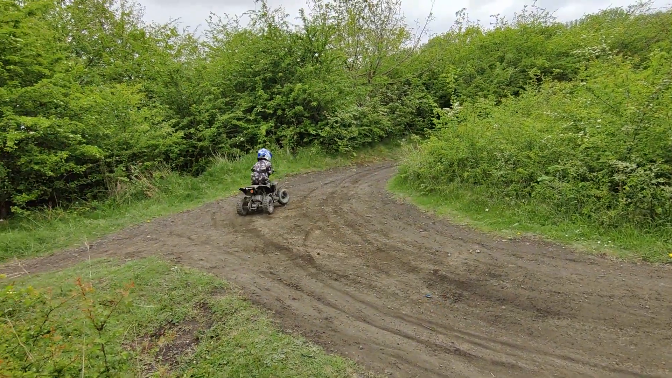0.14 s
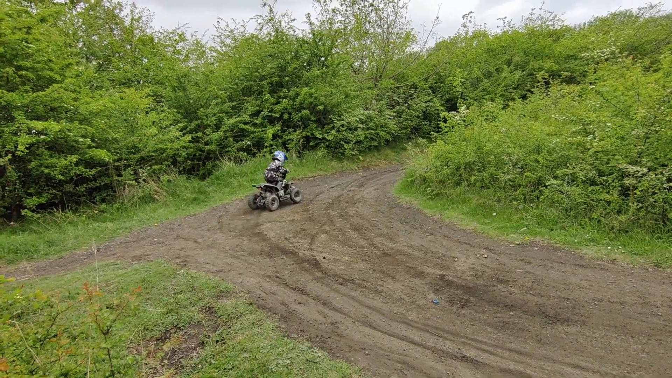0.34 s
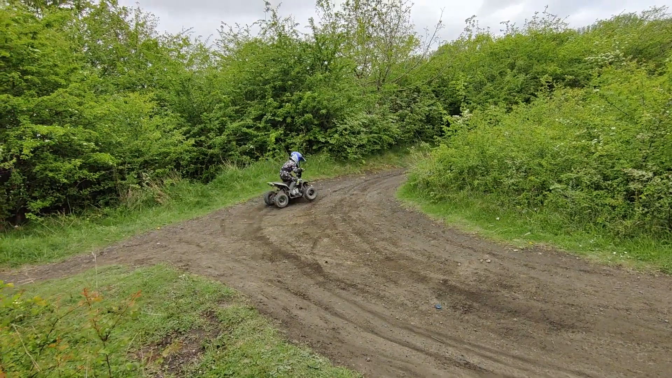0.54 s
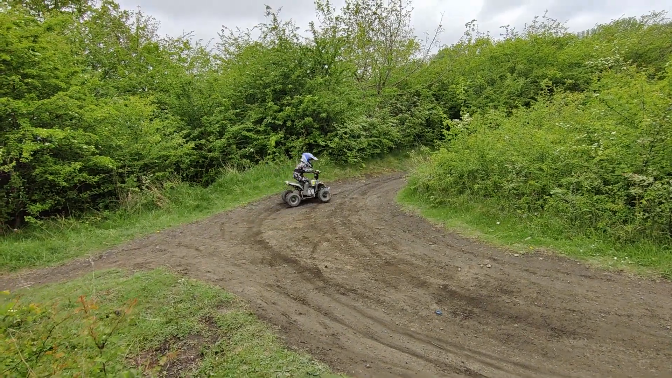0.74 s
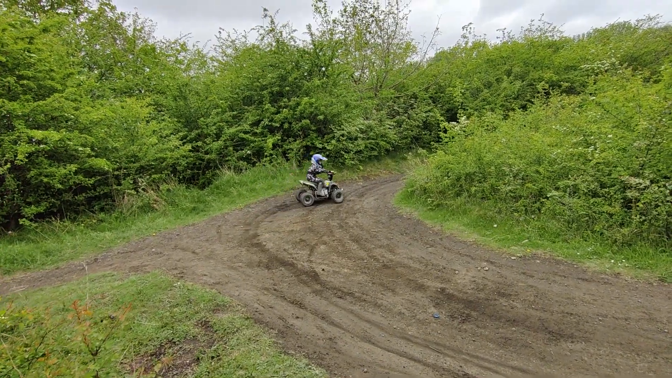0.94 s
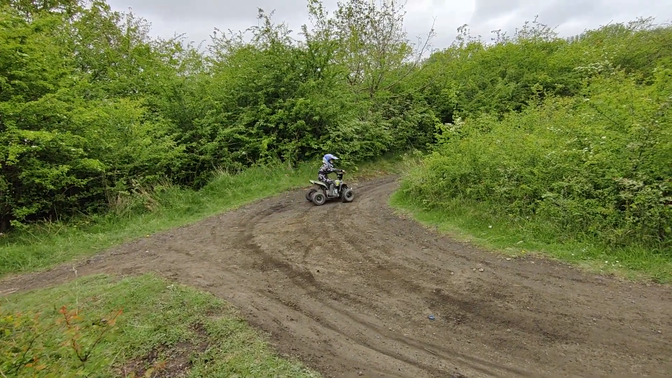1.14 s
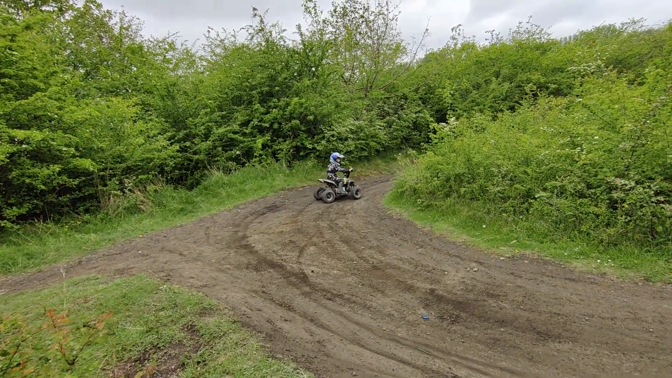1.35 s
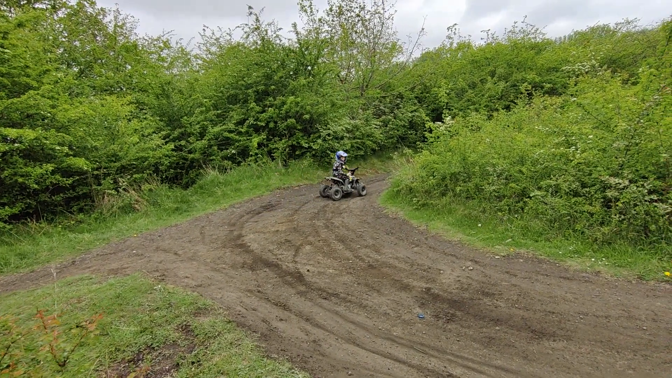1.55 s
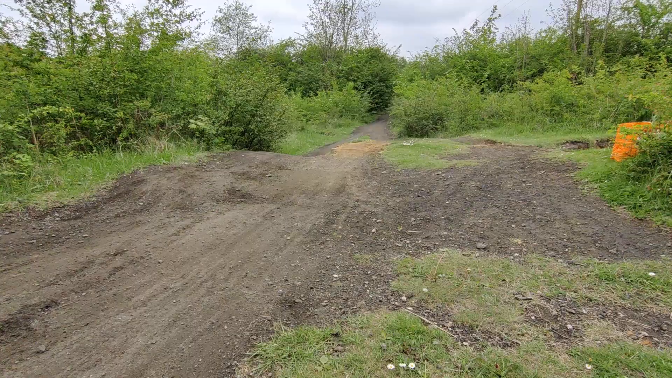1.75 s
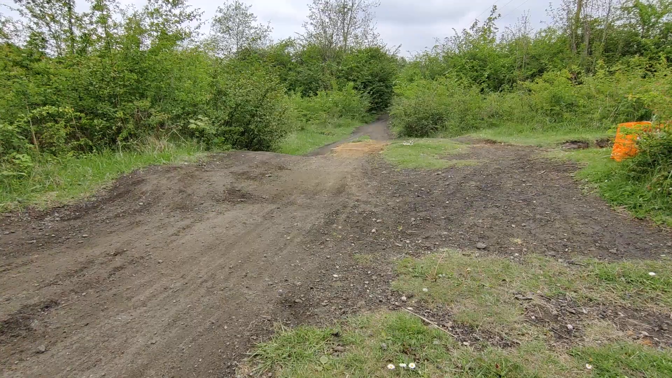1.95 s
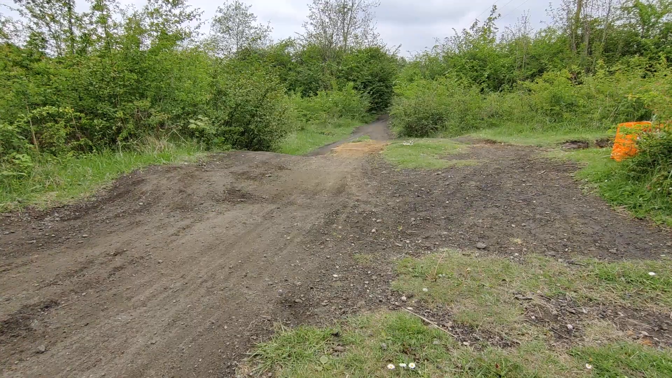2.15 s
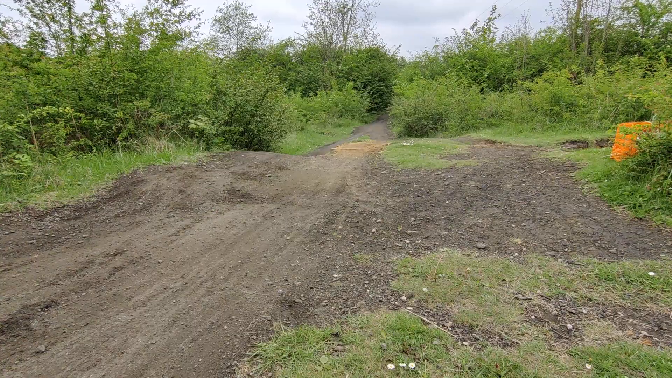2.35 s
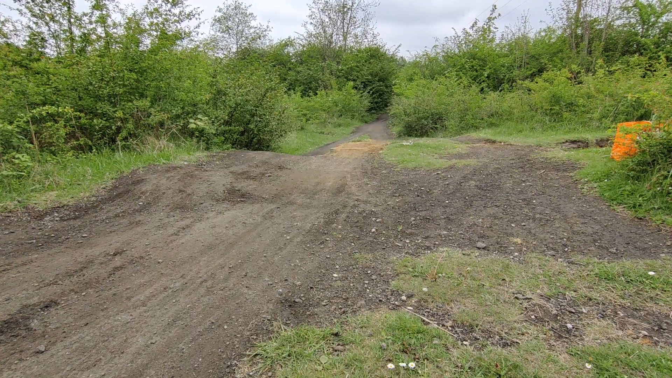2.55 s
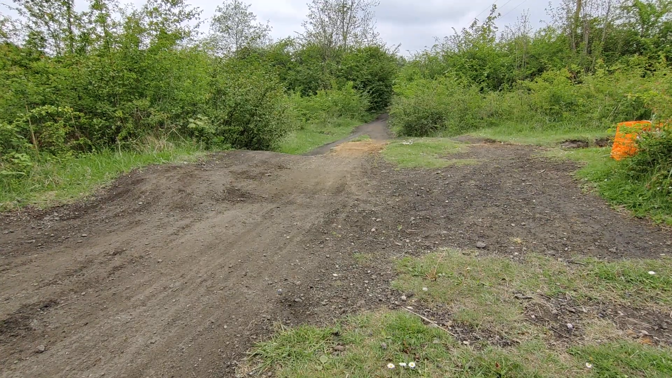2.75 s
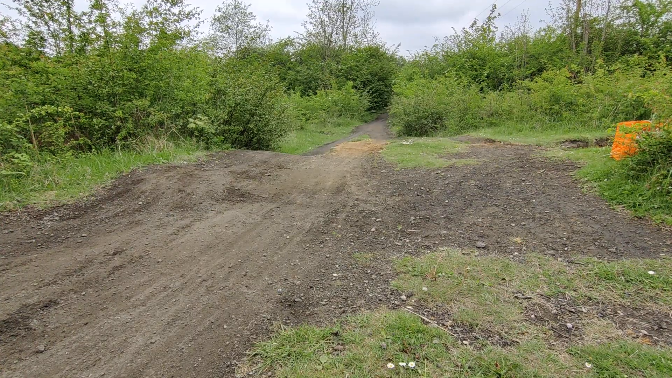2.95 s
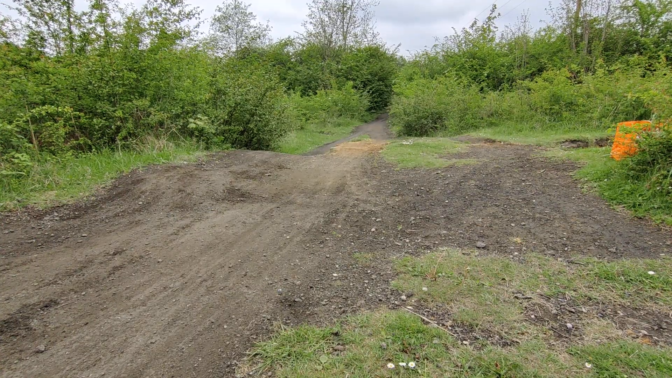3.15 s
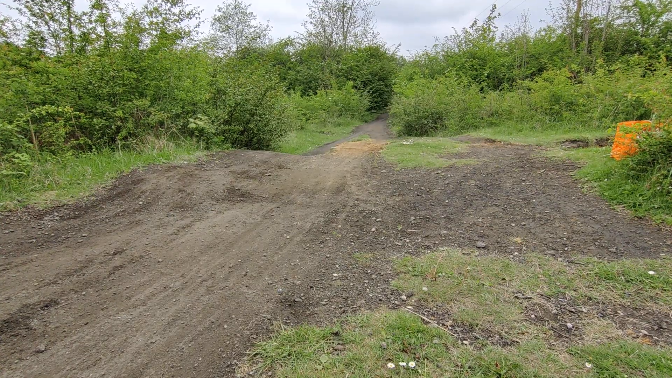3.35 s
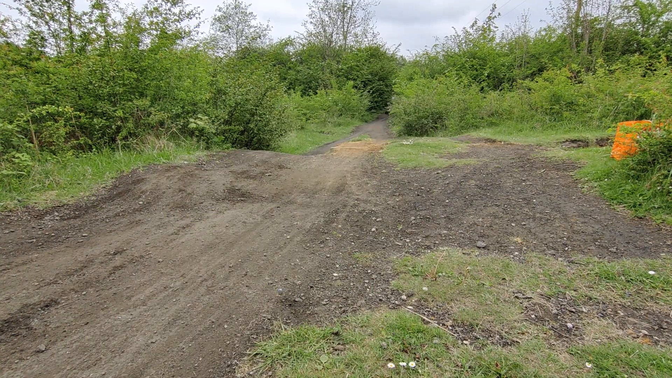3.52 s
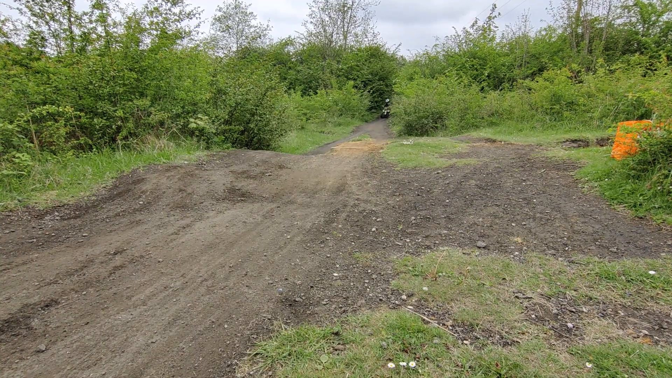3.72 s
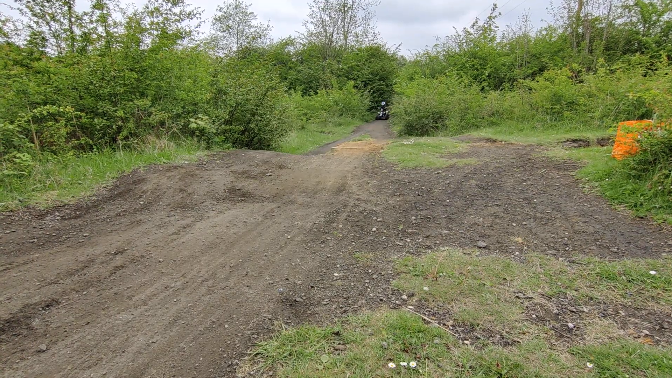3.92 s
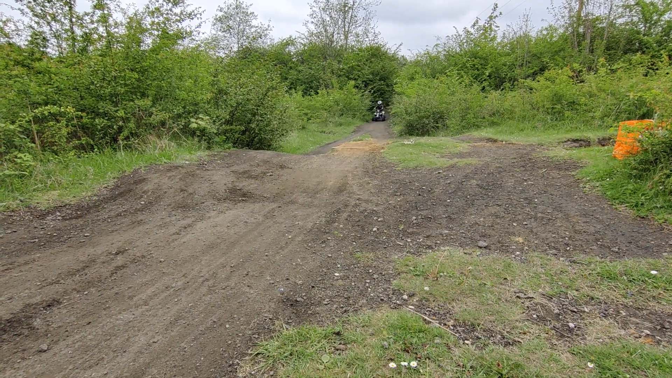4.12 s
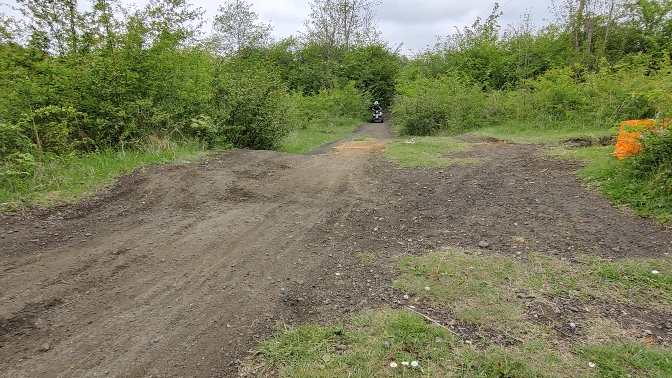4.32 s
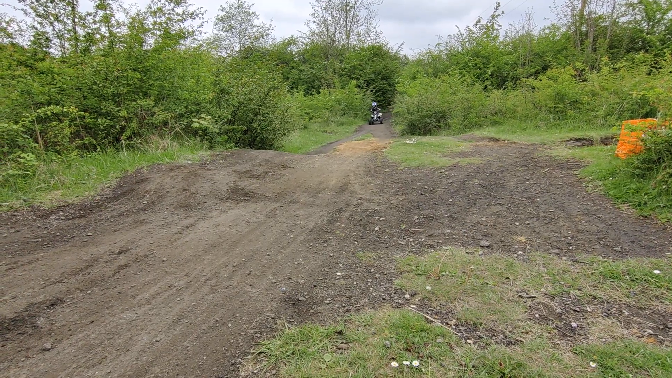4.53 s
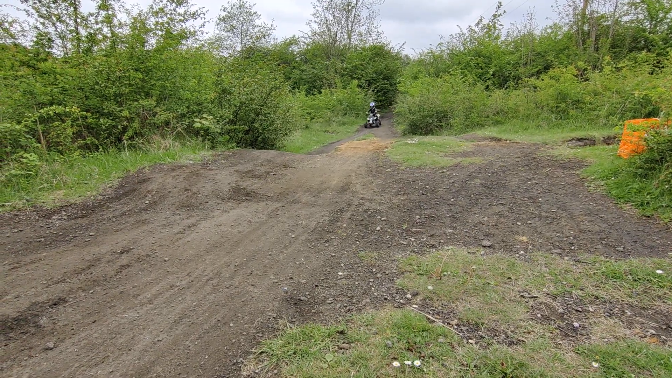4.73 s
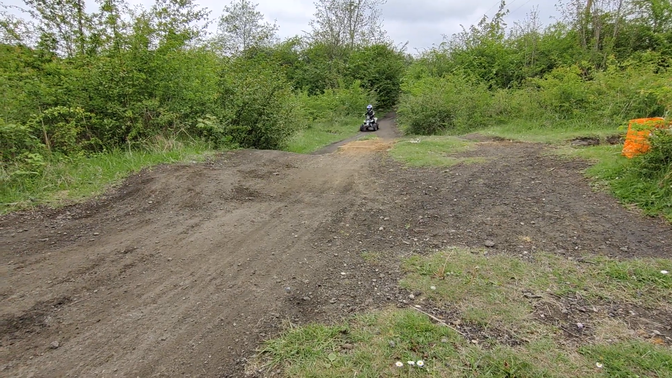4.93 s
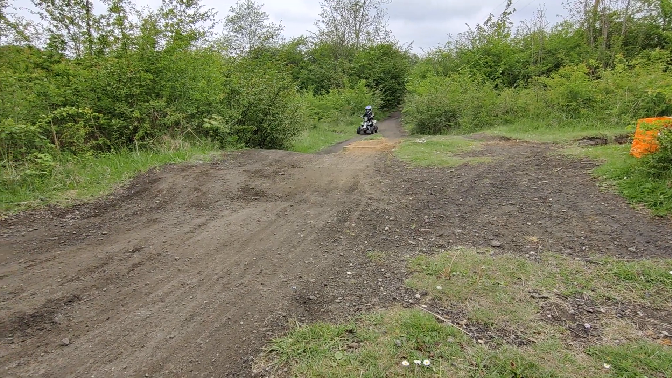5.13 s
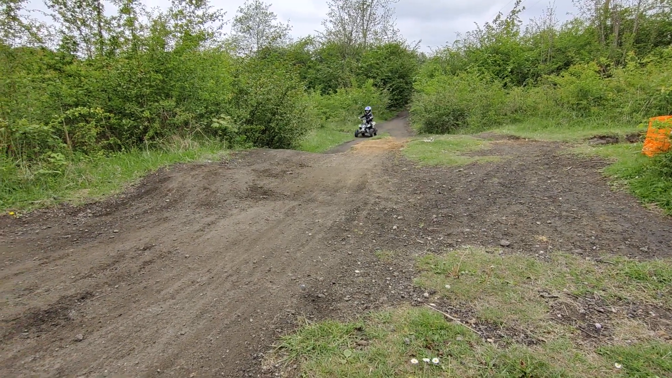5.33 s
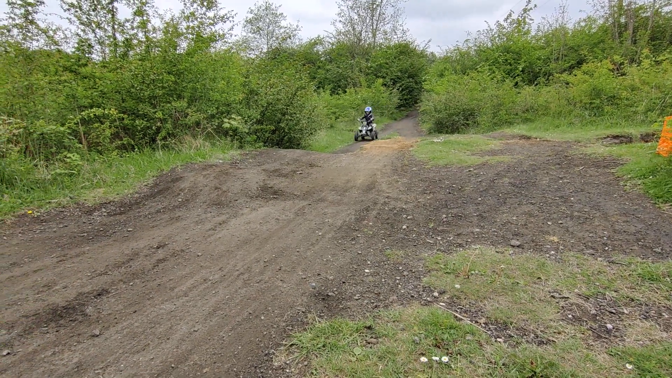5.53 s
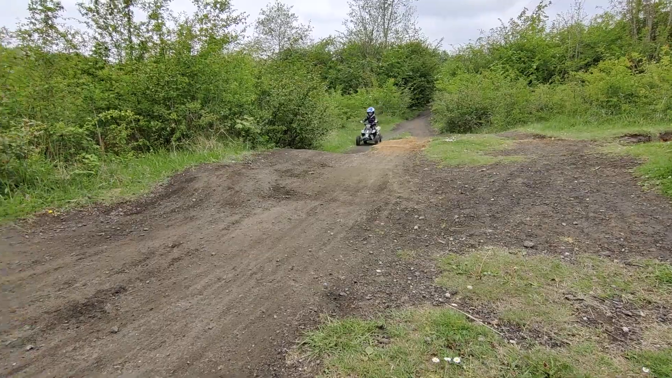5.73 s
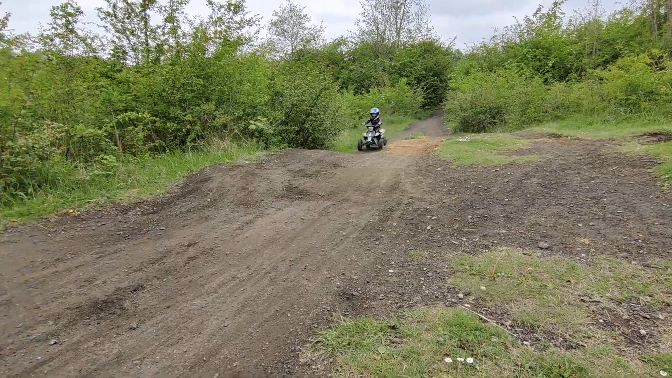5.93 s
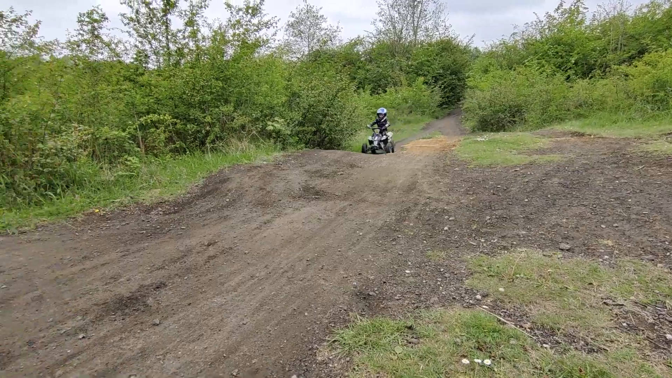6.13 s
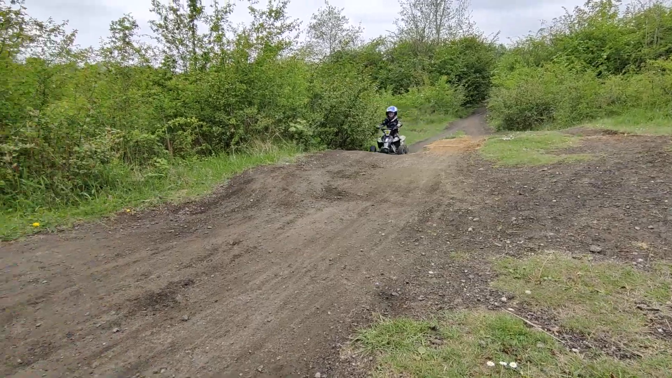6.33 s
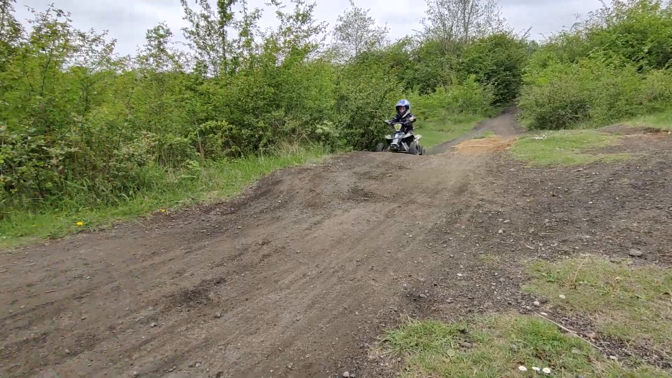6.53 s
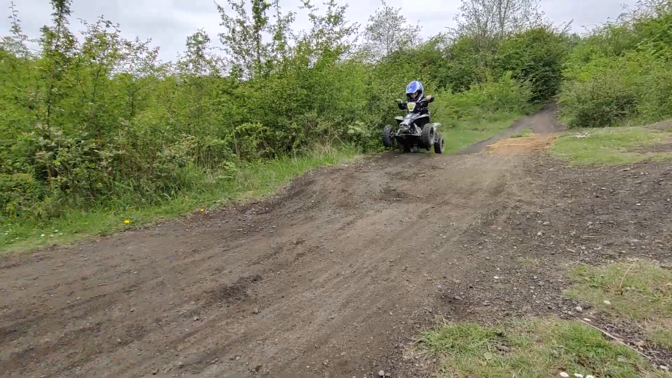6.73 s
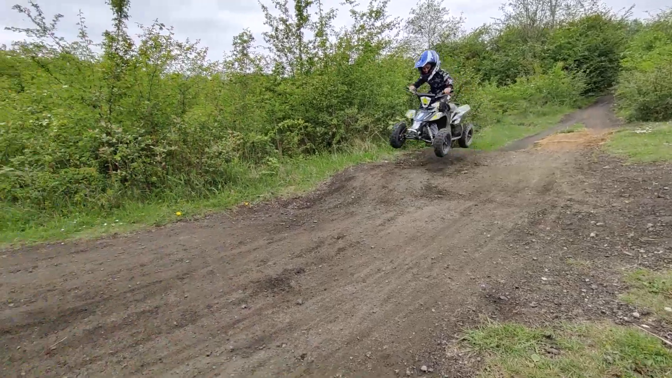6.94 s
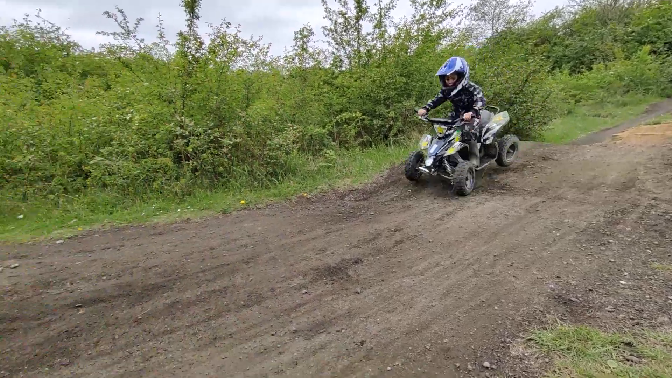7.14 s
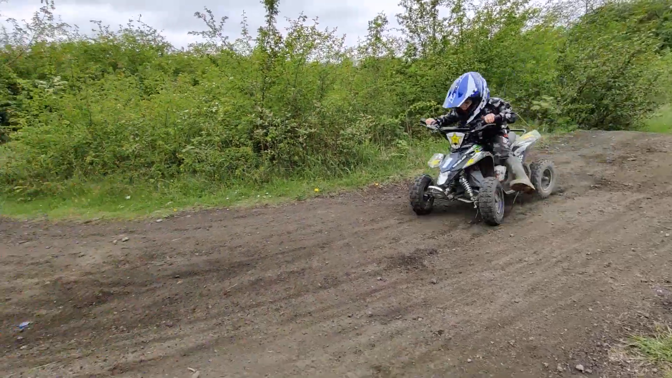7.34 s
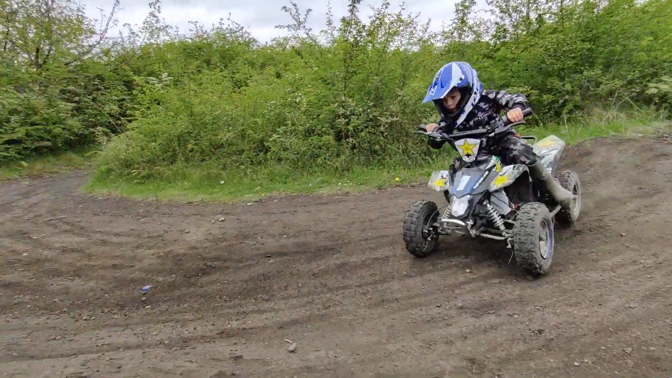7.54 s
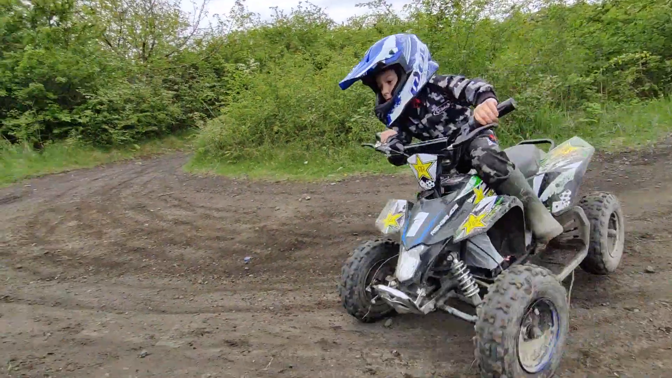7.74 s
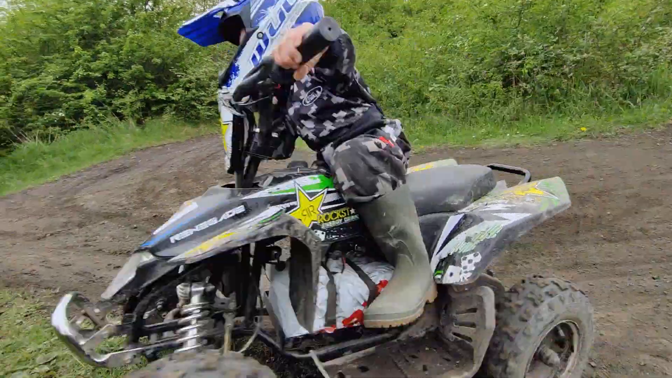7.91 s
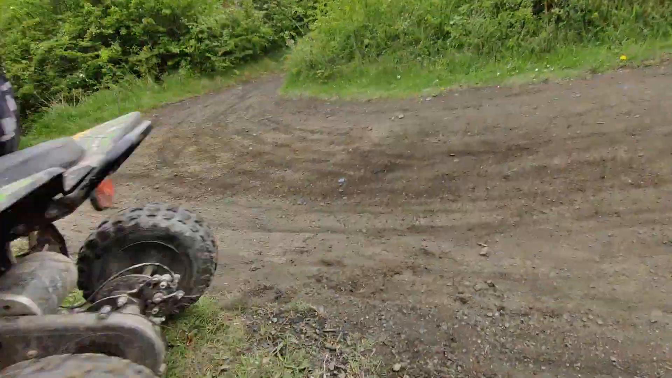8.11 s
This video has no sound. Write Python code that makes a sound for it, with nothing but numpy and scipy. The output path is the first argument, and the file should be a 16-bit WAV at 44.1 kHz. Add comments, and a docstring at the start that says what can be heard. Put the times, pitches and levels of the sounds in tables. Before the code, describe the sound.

Gravel crunch and whining motor recede, the sound suddenly drops, faint birds chirp, then an electric quad approaches, jumps, thuds down and sweeps by.

```python
"""Electric quad bike hopping on a dirt track

It rides off round a bend; after an abrupt break it returns from afar, hops a hump, lands hard and passes close by.
Tyres: stone pings and sand noise in three bands. Gears and motor: shaken tones. Chain: link taps ring the sprocket.
Frame and panels: struck modes. Single stones and sand spray: bright noise. Birds: gliding sines with an echo.
Wind and hush: coloured noise.
"""
import sys
import numpy as np
from scipy import signal
from scipy.fft import rfft, irfft
from scipy.io import wavfile
from scipy.ndimage import map_coordinates

SR = 44100
rng = np.random.default_rng(int(sys.argv[2]) if len(sys.argv) > 2 else 0)


def inscribe(sig):
    """Save sig as 16-bit PCM at rate SR to the path in sys.argv[1].

    A 1-D sig is mono; a 2-D sig holds one channel per row.
    Samples are clipped to [-1, 1] before scaling.
    """
    pcm = np.round(np.clip(np.atleast_2d(sig).T, -1, 1) * 32767)
    wavfile.write(sys.argv[1], SR, pcm.astype(np.int16))


N = 364707
TIME = np.arange(N) / SR
BREAK_S, LANDING_S = 1.84, 7.38
CUTOFF_HZ = 15900

# steady hush of air and leaves: freq_hz, relative_density_db
HUSH_COLOUR = [(25, -0.5), (60, -1), (130, -10.5), (280, -21), (1000, -24.5), (2400, -29), (4200, -41),
               (9000, -58.5)]
# wind on the microphone, one list before and one after the break: time_s, relative_level_db
WIND_LEVELS = [
    [(0.05, -31), (0.762, -25.5), (1.224, -35.5), (1.83, -31)],
    [(2.1, -75.5), (3.7, -53), (5.16, -53), (5.6, -39.5), (6.28, -41.5), (6.96, -35.5), (7.32, -39.5),
     (7.44, -26.5), (8.27, -27.5)],
]
# wind spectrum: freq_hz, relative_density_db
WIND_COLOUR = [(12, -7), (26, 1.5), (40, -1.5), (62, -1), (100, -8), (150, -35), (400, -54.5)]
# bird chirps: start_s, length_s, start_hz, end_hz, relative_level_db
CHIRPS = [(1.333, 0.062, 5800, 6200, -49), (1.482, 0.051, 5500, 4300, -46),
          (1.62, 0.054, 4600, 5000, -44.5), (1.633, .028, 3520, 2600, -41), (1.767, .02, 4950, 4150, -44),
          (1.782, 0.029, 3700, 2300, -41), (5.055, 0.066, 4850, 4200, -58), (5.325, 0.074, 4400, 5100, -56),
          (5.39, .055, 4700, 4100, -56), (5.56, 0.05, 4200, 5150, -55), (5.717, 0.06, 5050, 4200, -55),
          (6.15, 0.045, 3950, 5460, -54)]
# repeats of a tumbling four-note phrase: start_s
PHRASE_STARTS_S = [5.503, 5.642, 5.777, 5.913, 6.049]
# notes of that phrase: delay_s, length_s, start_hz, end_hz, relative_level_db
PHRASE = [(0.004, 0.024, 5650, 5200, -53), (.01, .016, 4350, 3850, -55), (.022, 0.019, 3850, 4250, -47),
          (.042, 0.026, 3900, 2850, -50)]
# repeats of the rising note that opens a song: start_s
RISE_STARTS_S = [4.884, 4.999, 5.117, 5.236]
# the rising note: length_s, start_hz, end_hz, relative_level_db
RISE = (0.044, 3350, 4750, -53)
BIRD_ECHO_SHARE = 0.3

# bike to microphone, riding off: time_s, distance_m
RIDING_OFF = [(0.0, 8.56), (0.6, 6.16), (1.3, 9.65), (1.83, 10.4)]
# bike to microphone, coming back: time_s, distance_m
COMING_BACK = [(2.1, 100), (3.4, 20.2), (4.2, 21), (5.27, 12.2), (5.8, 8.9), (6.44, 9), (7.0, 5.17),
               (7.7, 2.67), (8.27, 1.42)]
# stages of the ride: start_s, length_s
SKID_ENDS, CLEARS_BUSHES = (0.81, 0.11), (3.28, 0.72)
CRESTS_HUMP, LIFTS_OFF = (6.44, 0.095), (7.08, 0.41)
# how sounds carry: relative_level_at_1m_db, loss_per_doubling_db, bushes_loss_db, hump_loss_db
DRUM_CARRY, CRUNCH_CARRY = (-17, 8, 3.5, 7), (-20.5, 7, 8.5, 7.5)
GRIT_CARRY, WHINE_CARRY = (-22.5, 9, 2, 6), (-19.5, 7.8, 32, 12)

# motor song pulling out of the bend: time_s, mean_pitch_hz, relative_level_db
MOTOR_SONG = [(0, 2092, -29), (.14, 2150, -29.5), (.28, 2126, -36), (.35, 2100, -47.5), (.75, 2080, -51),
              (1.84, 2166, -73.5)]
# partials of the song: pitch_ratio, relative_level_db
MOTOR_PARTIALS = [(0.89, -4), (1, 2), (1.05, -2), (1.54, -5)]
# drive speed; sags on the hump, spins up in the air, slows after landing: time_s, mean_tooth_rate_hz
DRIVE_SPEED = [(3.7, 582), (6.1, 564), (6.93, 540), (7.02, 442), (7.13, 445), (7.23, 543), (7.44, 592),
               (7.6, 565), (7.66, 492), (7.85, 437), (7.96, 446), (8.05, 430), (8.27, 455)]
# gear whine overtones: multiple, far_relative_db, near_relative_db
GEAR_ORDERS = [(1, -0.5, -2.5), (2, -21.5, -12.5), (4, -24.5, -18), (5, -35, -25.5)]
# gears bite harder under load: time_s, gain_db
SURGES = [(4.13, 6), (4.202, 11), (4.315, 12), (4.555, 5), (4.677, 8), (5.145, 9), (5.8, 10), (5.842, 9),
          (5.945, 10), (6.025, 8), (6.06, 10), (6.15, 8), (6.19, 8), (6.28, 9), (6.975, 12), (7.015, 10),
          (7.71, 7)]
# random shaking of the gear tone, as a share
GROUND_ROUGH, AIRBORNE_ROUGH, PASSING_ROUGH = 0.35, 0.45, 0.65
GEAR_SLACK_S = 7.09
THROB_FAR_DB, THROB_NEAR_DB = 7.5, 2.5
# the drive passes side-on
BROADSIDE_S, BROADSIDE_HALF_S, OVERTONE_SHINE_DB = 7.98, 0.15, 14.6
# sprocket modes with the chain taut: pitch_hz, relative_level_db, t60_s
SPROCKET_MODES = [(1802, 7.5, 0.04), (2274, 3, 0.035), (4155, 4.5, 0.016)]
# chain slackens after landing: time_s, fall_s, recovery_s
CHAIN_SLACK = (7.6, 0.25, 0.22)
CHAIN_SAG_SHARE = 0.055  # pitch lost when slackest

# frame and panel blows: time_s, clack_relative_db, thud_relative_db, favoured_pitch_hz
KNOCKS = [(0.405, -13, -29, 760), (0.443, -3, -27, 780), (0.453, -7, -26.5, 732), (0.662, -8.5, -23.5, 740),
          (0.73, -5.5, -37.5, 1410), (0.765, -9, -23, 1320), (0.802, -3.5, -25.5, 1930),
          (0.811, -8, -32, 775), (0.837, -8.5, -26, 2320), (0.918, -22, -44.5, 1346),
          (0.946, -9.5, -36.5, 1980), (1.025, -16.5, -24.5, 730), (1.096, -18, -44, 2190),
          (1.141, -17.5, -24, 740), (1.266, -21, -33.5, 2150), (1.47, -21.5, -34, 1260),
          (1.645, -16, -29, 800), (6.92, -19, -42, 1150), (7.087, -18.5, -27, 1150),
          (7.261, -13, -49, 1770), (7.397, -7, -22, 740), (7.431, -9.5, -21.5, 740),
          (7.456, -8.5, -18, 1810), (7.541, -2, -24.5, 1700), (7.883, -2, -27.5, 921),
          (8.107, -3, -17, 1150), (8.176, -2.5, -21, 955)]
# frame modes: pitch_hz, relative_level_db, t60_s
THUD_MODES = [(151, -7, 0.048), (206.6, 3, 0.052), (269, 1.5, 0.092), (308, 3, 0.055), (552, 0, 0.05)]
# panel modes: pitch_hz, relative_level_db, t60_s
CLACK_MODES = [(740, -7.5, 0.04), (917, -6.5, 0.032), (1150, -6, 0.021), (1372, -2, 0.02),
               (1700, -5, 0.018), (2150, -6, 0.036), (2584, -5, 0.019), (3480, -8.5, 0.021)]
# single stones snapping from under the tyres: time_s, relative_level_db
STONES = [(0.21, -22), (0.278, -15), (0.3836, -14), (0.471, -18), (0.764, -13.5), (0.942, -18.5),
          (1.301, -25), (1.471, -21), (2.929, -54), (4.031, -49), (4.205, -45), (5.372, -36), (5.558, -37),
          (5.707, -32), (6.23, -35.5), (6.423, -34), (7.0984, -20), (7.1255, -17), (7.216, -27),
          (7.254, -27), (7.384, -22), (7.7024, -11), (8.0752, -8), (8.113, -5.5), (8.175, -4.5)]

# rolling noise riding off: freq_hz, relative_density_db
LEAVING_COLOUR = [(110, 3), (300, -6), (740, -3), (2100, -12.5), (3400, -17), (4700, -24), (6500, -23),
                  (7600, -31), (10000, -28), (16000, -40.5)]
# rolling noise coming back: freq_hz, relative_density_db
NEARING_COLOUR = [(110, 2), (370, -13), (1050, -9.5), (1700, -15), (3000, -27), (6400, -32.5),
                  (7600, -41.5), (15000, -37)]
# rolling noise close by: freq_hz, relative_density_db
PASSING_COLOUR = [(110, 2), (290, 0), (900, -9.5), (1800, -11), (3000, -20.5), (4200, -17.5), (6400, -21.5),
                  (7400, -31), (15000, -24.5)]
# bike and ground resonances and hollows riding off: centre_hz, width_hz, gain_db
LEAVING_PEAKS = [(294, 180, 6), (442, 72, -12), (740, 150, 2.5), (1070, 190, -3.5), (1816, 99, -12.5),
                 (1990, 360, 6), (2880, 220, -10)]
# the same coming back: centre_hz, width_hz, gain_db
NEARING_PEAKS = [(784, 180, -3), (1090, 170, 3), (1287, 190, -9.5), (1775, 53, -7.5), (2150, 100, -6),
                 (2500, 170, 1.5), (2635, 120, -11)]
# the same close by: centre_hz, width_hz, gain_db
PASSING_PEAKS = [(371, 66, -5.5), (1498, 206, -11.5), (1690, 220, 4), (2160, 520, -5), (2756, 70, -15)]
# grip, in order drumming, crunch, grit: skid_gain_db, full_air_loss_db
GRIP = [(7, 22), (8, 11.5), (12, 5.5)]
# tyres press into ruts and go light over crests: time_s, release_s, drumming_gain_db, gravel_gain_db
BUMPS = [(.03, 0.19, 3.5, 7), (.16, 0.061, 5, 6), (0.66, 0.17, 2.5, -0.5), (.915, 0.04, -9, -4),
         (0.96, 0.066, 11.5, 12), (1.041, 0.06, 12.5, 5), (3.929, 0.06, 3, 5.5), (5.396, 0.04, 7.5, 4),
         (5.52, 0.12, 3.5, -0.5), (5.94, 0.02, 5.5, 7.5), (7.067, 0.034, -10, -12), (7.096, 0.33, 0.5, 5.5),
         (7.449, 0.16, 8, 5), (7.513, 0.12, 2.5, 9), (8.236, 0.035, 8, 3)]
BUMP_ATTACK_SHARE = 0.54  # of the release

# left-right likeness: freq_hz, coherence
LIKENESS = [(30, 0.78), (130, 1), (600, 0.95), (1100, 0.94), (1900, 0.42), (3100, 0.1), (6800, 0.25),
            (14000, 0.36)]
# sound reaches the left port first: time_s, lead_s
LEFT_LEAD = [(1.8, 0.000077), (3.5, 0.00019), (7.5, 0.000064)]
COMPACT_SIDE_DB = -9.5  # gears and frame narrower than the gravel
# drop at the break and swell back: time_s, gain_db
FADE = [(1.838, -4.5), (1.842, -34), (2.04, -16), (2.12, -5), (2.4, 2)]


def from_db(db):
    """Decibels to gain."""
    return 10 ** (np.asarray(db) / 20)


def rms(x):
    """Root mean square."""
    return np.sqrt(np.mean(x ** 2) + 1e-20)


def in_time(rows):
    """Each column of a curve at every sample."""
    s, *columns = np.transpose(rows)
    return [np.interp(TIME, s, c) for c in columns]


def at_hz(points, hz):
    """Read a spectrum on a log-frequency axis."""
    f, value = np.transpose(points)
    return np.interp(np.log(hz + 1), np.log(f), value)


def ramp(start_s, length_s):
    """Rises from 0 to 1 and stays there."""
    return np.clip((TIME - start_s) / length_s, 0, 1)


def swell(peak_s, attack_s, release_s):
    """Rises to 1 at peak_s and falls back to 0."""
    return np.interp(TIME, [peak_s - attack_s, peak_s, peak_s + release_s], [0, 1, 0])


def drift(rate_hz):
    """Smooth random curve of rms near 1, wandering at about rate_hz."""
    step = 40  # computed at SR / step, then interpolated
    r = np.exp(-2 * step * np.pi * rate_hz / SR)
    slow = signal.lfilter([1], [1, -2 * r, r * r], rng.standard_normal(N // step + 2002))[2000:]
    return np.interp(np.arange(N) / step, np.arange(len(slow)), slow / rms(slow))


def band(x, edges_hz, kind, order=4):
    """Butterworth filter."""
    return signal.sosfilt(signal.butter(order, edges_hz, kind, fs=SR, output="sos"), x + 1e-18)


def colour(x, spectrum, peaks=(), size=8192):
    """Minimum-phase filter with a broad spectrum and bell-shaped resonances."""
    hz = np.arange(size // 2 + 1) * SR / size
    db = at_hz(spectrum, hz)
    for centre_hz, width_hz, gain_db in peaks:
        db = db + gain_db * 2 ** -((2 * (hz - centre_hz) / width_hz) ** 2)
    cepstrum = irfft(np.log(from_db(db)))
    causal = 2 * cepstrum * (np.arange(size) < size // 2)
    response = irfft(np.exp(rfft(causal) - cepstrum[0]))
    return signal.fftconvolve(x, response[None], axes=1)[:, :N]


def ring(clicks, hz, t60_s):
    """A unit click sets a decaying sine of initial height 1 ringing."""
    r, w = from_db(-60 / (t60_s * SR)), 2 * np.pi * hz / SR
    return signal.lfilter([0, np.sin(w)], [1, -2 * r * np.cos(w), r * r], clicks + 1e-18)


def rough_tone(hz, rough, flutter_hz):
    """Tone with randomly shaken strength and phase; centre and side."""
    phase = 2 * np.pi * np.cumsum(hz) / SR
    shake = np.array([[drift(flutter_hz), drift(flutter_hz)] for _ in range(2)]) * rough
    shake[0, 0] += 1  # the steady part, centre only
    return (shake[:, 0] * np.sin(phase) + shake[:, 1] * np.cos(phase)) / np.sqrt(0.5 + rough ** 2)


def strike(times_s, levels_db, mode, rattle_s, rattle_share):
    """Each blow is a hit and a short rattle that set one mode ringing."""
    hz, mode_db, t60_s = mode
    force, age_s = np.zeros((2, N + SR)), TIME[:SR // 20]
    for s, db in zip(times_s, levels_db):
        blow = rattle_share * rng.standard_normal((2, len(age_s))) * np.exp(-age_s / rattle_s)
        blow[:, 0] += rng.choice([-1, 1], 2)
        first = round(s * SR)
        force[:, first:first + len(age_s)] += from_db(db + mode_db) * blow
    return ring(force[:, :N], hz, t60_s)


def carry(near_db, doubling_db, bushes_db, hump_db):
    """Level in dB: falls with distance; bushes and the hump screen the returning bike."""
    metres = np.where(TIME < BREAK_S, in_time(RIDING_OFF)[0], in_time(COMING_BACK)[0])
    screened_db = bushes_db * (1 - ramp(*CLEARS_BUSHES)) + hump_db * (1 - ramp(*CRESTS_HUMP))
    return near_db - doubling_db * np.log2(metres) - screened_db * (TIME >= BREAK_S)


def hush(level_db=-58):
    """Faint steady noise of air and leaves, coloured by reflection from the ground."""
    air = colour(rng.standard_normal((2, N)), HUSH_COLOUR, NEARING_PEAKS)
    return air / rms(air[0]) * from_db(level_db)


def wind(level_db=0.34, gust_db=-2.0):
    """Lumpy low rumble on the microphone ports: coloured noise with a drifting level."""
    rumble = colour(rng.standard_normal((2, N)), WIND_COLOUR) * from_db(gust_db * drift(8.8))
    curve_db = np.where(TIME < BREAK_S, in_time(WIND_LEVELS[0])[0], in_time(WIND_LEVELS[1])[0])
    return rumble / rms(rumble[0]) * from_db(curve_db + level_db)


def birds(level_db=-2, accent_db=2.5, side_share=0.72, echo_s=0.019):
    """Short gliding whistles with a faint scattered echo in the bushes."""
    out = np.zeros(N)
    song = [(s, *RISE) for s in RISE_STARTS_S]
    song += [(s + delay_s, *note) for s in PHRASE_STARTS_S for delay_s, *note in PHRASE]
    for s, length_s, start_hz, end_hz, db in CHIRPS + song:
        u = np.linspace(0, 1, round(length_s * SR))
        phase = 2 * np.pi * np.cumsum(start_hz + (end_hz - start_hz) * u) / SR
        gain = from_db(db + level_db + accent_db * rng.standard_normal())
        first = round(s * SR)
        out[first:first + len(u)] += gain * np.sin(np.pi * u) * np.sin(phase)
    scatter = rng.standard_normal((2, SR // 4)) * np.exp(-TIME[:SR // 4] / echo_s)
    echo = signal.fftconvolve(out[None], scatter / np.linalg.norm(scatter[0]), axes=1)[:, :N]
    return np.array([out, side_share * out]) + BIRD_ECHO_SHARE * echo


def far_motor(hz=2350, sideband_hz=1880, level_db=-67.0, climb=0.03, waver=0.012):
    """Wavering motor whine from down the track; two tones that climb a little."""
    speed = 1 + climb * ramp(*CLEARS_BUSHES) + waver * drift(10.5)
    whine = sum(rough_tone(f * speed, rough=0.75, flutter_hz=35) for f in (hz, sideband_hz))
    return whine * from_db(level_db) * swell(3.58, attack_s=0.77, release_s=3.3)


def motor(waver=0.011):
    """High wavering whine of several partials that fades as the bike rides off."""
    hz, db = in_time(MOTOR_SONG)
    hz = hz * (1 + waver * drift(25))
    whine = sum(from_db(part_db) * rough_tone(hz * ratio, rough=0.42, flutter_hz=70)
                for ratio, part_db in MOTOR_PARTIALS)
    return whine * from_db(db) * (TIME < BREAK_S)


def chain(tooth_hz, near_db=-25.0, doubling_db=5, uneven_db=2.0, shine_db=3.5, taut_db=11):
    """Links tap the sprocket unevenly and ring its modes, louder once the hop has shaken the chain loose."""
    links = np.diff(np.floor(np.cumsum(tooth_hz) / SR), prepend=0)
    taps = links * from_db(uneven_db * drift(60)) * rng.standard_normal((2, N))
    out = sum(from_db(db) * ring(taps, hz, t60_s) for hz, db, t60_s in SPROCKET_MODES)
    clock_s = np.cumsum(1 - CHAIN_SAG_SHARE * swell(*CHAIN_SLACK)) / SR  # a slower clock lowers the pitch
    out = np.array([np.interp(clock_s, TIME, channel) for channel in out])
    level_db = carry(near_db, doubling_db, 0, 0) - taut_db * (1 - ramp(6.94, 0.23))
    level_db = level_db + shine_db * swell(BROADSIDE_S, BROADSIDE_HALF_S, BROADSIDE_HALF_S)
    return out / rms(out) * from_db(level_db) * ramp(6.8, 0.17)


def throb(surge_times_s, beats_per_s=21, uneven=0.3):
    """Uneven, round-topped beats between -1 and 1 that fall into step with the surges."""
    clock = np.cumsum(np.exp(uneven * drift(13))) / SR
    marks = np.r_[0, np.interp(surge_times_s, TIME, clock), clock[-1]]
    whole_beats = np.maximum(1, np.round(np.diff(marks) * beats_per_s))
    beats = np.interp(clock, marks, np.r_[0, np.cumsum(whole_beats)])
    return 1 - 2 * (np.sin(np.pi * beats) ** 2) ** 2


def whine_level(surge_s=0.031, from_behind_db=9, slack_db=7):
    """Gear whine in dB: weak from behind, surging under load, slack in the air."""
    surges_db = np.max([db * np.sqrt(swell(s, surge_s, surge_s)) for s, db in SURGES], axis=0)
    slack = swell(GEAR_SLACK_S, attack_s=0.064, release_s=0.16)
    return carry(*WHINE_CARRY) - from_behind_db * (TIME < BREAK_S) + surges_db - slack_db * slack


def gear_whine(tooth_hz, wobble=0.02):
    """Changing load chops the gear tone into short beats; no throb or wobble through the hop."""
    landed = TIME >= LANDING_S
    hopping = (TIME > 6.95) & ~landed
    rough = np.where(hopping, AIRBORNE_ROUGH, np.where(landed, PASSING_ROUGH, GROUND_ROUGH))
    hz = tooth_hz * (1 + wobble * drift(42.2) * ~landed * ~hopping)
    shine_db = OVERTONE_SHINE_DB * swell(BROADSIDE_S, BROADSIDE_HALF_S, BROADSIDE_HALF_S)
    out = np.zeros((2, N))
    for order, far_db, near_db in GEAR_ORDERS:
        level_db = np.where(landed, near_db, far_db) + shine_db * (order > 1)
        out += from_db(level_db) * rough_tone(order * hz, rough, flutter_hz=38)
    depth_db = np.where(landed, THROB_NEAR_DB, THROB_FAR_DB) * ~hopping
    return out * from_db(whine_level() + depth_db * throb([s for s, _ in SURGES]))


def knocks(thud_db=-3, clack_db=-0.5, focus_db=13, focus_octaves=0.28, bounce_s=0.011, bounce_db=-7):
    """Frame thuds and panels clack, then bounce once; each clack favours modes near its own pitch."""
    s, clack, thud, pitch_hz = np.transpose(KNOCKS)
    times_s = np.r_[s, s + bounce_s * rng.uniform(0.7, 1.4, len(s))]
    bounce = np.repeat([0, bounce_db], len(s))
    out = np.zeros((2, N))
    for mode in THUD_MODES:
        level_db = np.tile(thud + thud_db, 2) + bounce
        out += strike(times_s, level_db, mode, rattle_s=0.015, rattle_share=0.072)
    for mode in CLACK_MODES:
        octaves_off = np.abs(np.log2(mode[0] / pitch_hz))
        level_db = clack + clack_db - focus_db * np.minimum(octaves_off / focus_octaves, 1)
        out += strike(times_s, np.tile(level_db, 2) + bounce, mode, rattle_s=0.0023, rattle_share=0.085)
    return out


def rattle(crunch_db, level_db, spread_db=2, count=34):
    """Loose panels chatter at random over the ruts of the bend, following the crunch level."""
    times_s = rng.uniform(0.3, BREAK_S - 0.05, count)
    levels_db = np.interp(times_s, TIME, crunch_db) + level_db + spread_db * rng.uniform(-0.82, 1, count)
    return sum(strike(times_s, levels_db, mode, rattle_s=0.0044, rattle_share=0.15)
               for mode in CLACK_MODES[3:])


def stones(level_db=-8.0, decay_s=0.0098, top_hz=5500):
    """A stone snaps in a decaying burst of bright crackle."""
    out, age_s = np.zeros((2, N + SR)), TIME[:SR // 20]
    for s, db in STONES:
        burst = rng.standard_normal((2, len(age_s))) * np.exp(-age_s / decay_s)
        first = round(s * SR)
        out[:, first:first + len(age_s)] += from_db(db + level_db) * burst
    bright = band(out[:, :N], 3000, "high", order=2)
    return band(bright, top_hz, "low", order=1)


def spray(level_db=-41, above_hz=9000):
    """Spinning rear tyres fling fine sand back as the bike turns away: high noise that soon fades."""
    sand = band(rng.standard_normal((2, N)), above_hz, "high")
    return sand / rms(sand) * from_db(level_db) * (1 - ramp(0.19, 0.07))


def grains(per_s, spread_db, sand_db, ping_db=3, cycles=40, count=24):
    """Stones crack at random, each with its own size, direction and brief ping, over a hiss of sand."""
    sizes = from_db(spread_db * np.minimum(rng.exponential(1, N), 4))
    clicks = (rng.random(N) < per_s / SR) * sizes * rng.choice([-1, 1], (2, N))
    dealt = rng.integers(0, count, N)  # pitch index of each stone
    pings = np.zeros((2, N))
    for k, hz in enumerate(np.geomspace(1500, 14500, count)):
        pings += hz * ring(clicks * (dealt == k), hz, cycles / hz)
    sand = from_db(sand_db) * rng.standard_normal((2, N))
    return clicks / rms(clicks) + from_db(ping_db) * pings / rms(pings) + sand


def tyre_levels():
    """Drumming, crunch and grit in dB: louder in the skid, shifted by every bump, dying away in the air."""
    skid, air = 1 - ramp(*SKID_ENDS), ramp(*LIFTS_OFF) * (TIME < LANDING_S)
    thump, gravel = 0, 0
    for s, release_s, thump_db, gravel_db in BUMPS:
        load = swell(s, BUMP_ATTACK_SHARE * release_s, release_s)
        thump = thump + thump_db * load
        gravel = gravel + gravel_db * load
    rolling = carry(*DRUM_CARRY) + thump, carry(*CRUNCH_CARRY) + gravel, carry(*GRIT_CARRY) + gravel
    return [level + skid_db * skid - air_db * air for level, (skid_db, air_db) in zip(rolling, GRIP)]


def tyres(levels, spectrum, peaks, per_s, spread_db, sand_db, clump_db, drum_db, crunch_db, grit_db):
    """Tread blocks drum on the dirt and crush gravel in clumps; fine grit sprays behind."""
    drum, crunch, grit = levels
    clumps = from_db(clump_db * drift(30))
    gravel = colour(grains(per_s, spread_db, sand_db) * clumps, spectrum, peaks)
    lows = band(band(gravel, 105, "high"), 550, "low")
    mids = band(gravel, [550, 3000], "band")
    highs = band(gravel, 3000, "high")
    out = lows / rms(band(lows[0], [110, 450], "band")) * from_db(drum + drum_db)
    out += mids / rms(band(mids[0], 650, "high")) * from_db(crunch + crunch_db)
    return out + highs / rms(highs[0]) * from_db(grit + grit_db)


def distance(x, dull_hz=5000, ground_hz=(600, 1300), ground_share=0.54):
    """Far down the track the top is lost, and soft ground swallows part of the middle."""
    far = 1 - ramp(3.26, 0.39)
    x = x - ground_share * (1 - ramp(5.05, 0.62)) * band(x, ground_hz, "band", order=1)
    return far * band(x, dull_hz, "low") + (1 - far) * x


def stereo(pair):
    """Centre and side to left and right: shared bass, wide treble, the right a little later."""
    alike = np.clip(at_hz(LIKENESS, np.arange(N // 2 + 1) * SR / N), -0.5, 0.995)
    side = irfft(rfft(pair[1]) * np.sqrt((1 - alike) / (1 + alike)), N)
    late_samples = (TIME - in_time(LEFT_LEAD)[0]) * SR
    right = map_coordinates(pair[0] - side, [late_samples], order=3)
    return np.array([pair[0] + side, right])


def scene():
    """Three stretches of the ride with drive, knocks, birds and wind; the left is a little louder."""
    levels = tyre_levels()
    leaving = tyres(levels, LEAVING_COLOUR, LEAVING_PEAKS, per_s=700, spread_db=1.44, sand_db=3.5,
                    clump_db=2.0, drum_db=2.0, crunch_db=2.0, grit_db=1.5)
    nearing = tyres(levels, NEARING_COLOUR, NEARING_PEAKS, per_s=2500, spread_db=1.5, sand_db=5.0,
                    clump_db=2.0, drum_db=0.0, crunch_db=-1.5, grit_db=0.0)
    passing = tyres(levels, PASSING_COLOUR, PASSING_PEAKS, per_s=2200, spread_db=0.4, sand_db=0.0,
                    clump_db=1.5, drum_db=0.5, crunch_db=0.5, grit_db=0.7)
    returning = np.where(TIME < LANDING_S, distance(nearing), passing)
    rolling = np.where(TIME < BREAK_S, leaving, returning)
    tooth_hz = in_time(DRIVE_SPEED)[0]
    compact = (gear_whine(tooth_hz) + knocks()) * from_db([[0], [COMPACT_SIDE_DB]])
    drive = compact + motor() + far_motor() + chain(tooth_hz)
    bike = rolling + drive + rattle(levels[1], level_db=5.0) + stones() + spray()
    mix = stereo(bike + birds() + wind() + hush())
    return mix * from_db([[0.6], [-0.6]]) * from_db(in_time(FADE)[0])


def record(dry):
    """Peaks beyond full scale clip, then a steep low-pass cuts the top."""
    low_pass = signal.ellip(10, 0.1, 80, CUTOFF_HZ, fs=SR, output="sos")
    return signal.sosfilt(low_pass, np.clip(dry, -1, 1))


dry = scene()
out = record(dry)
inscribe(out)
```